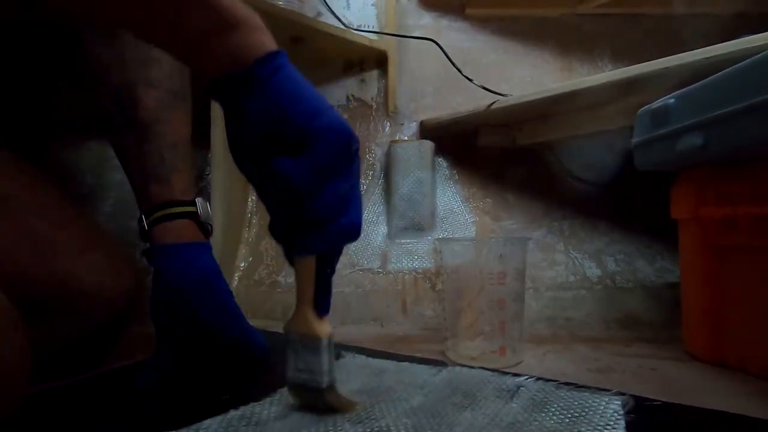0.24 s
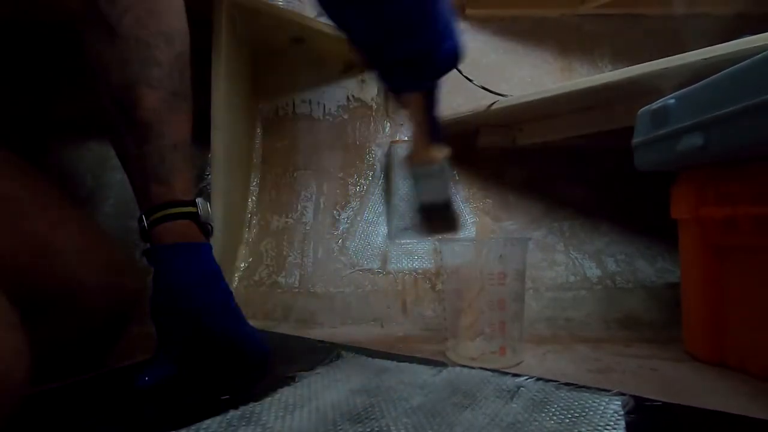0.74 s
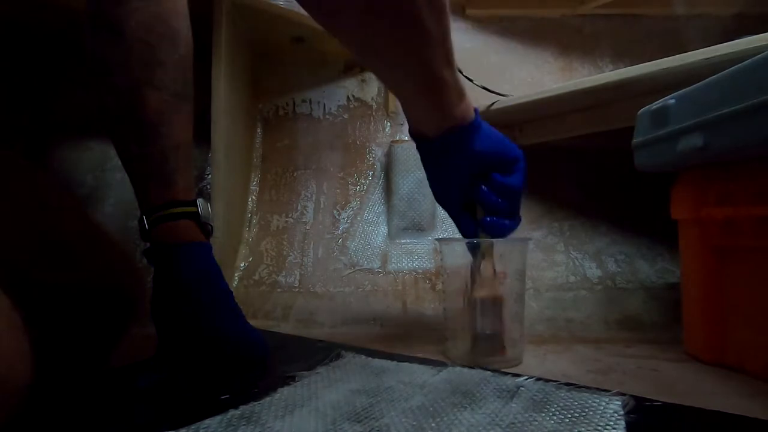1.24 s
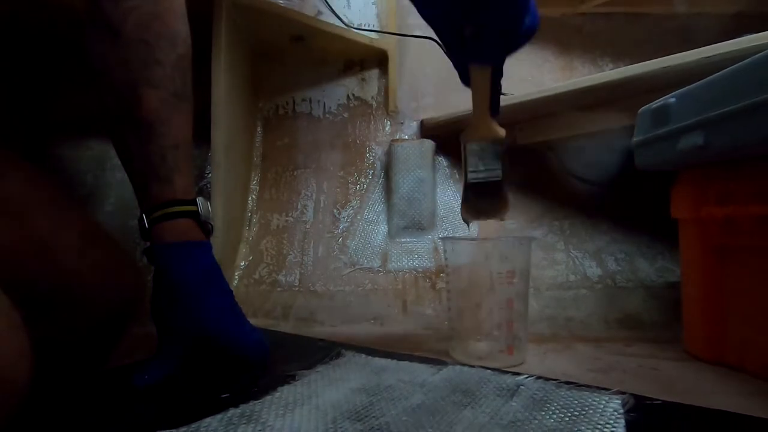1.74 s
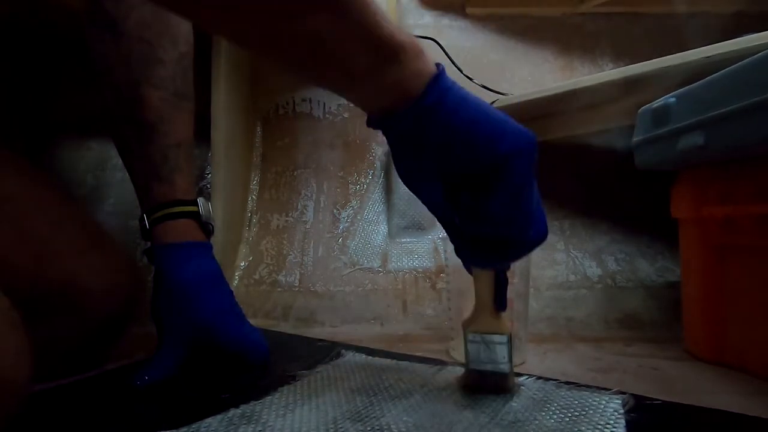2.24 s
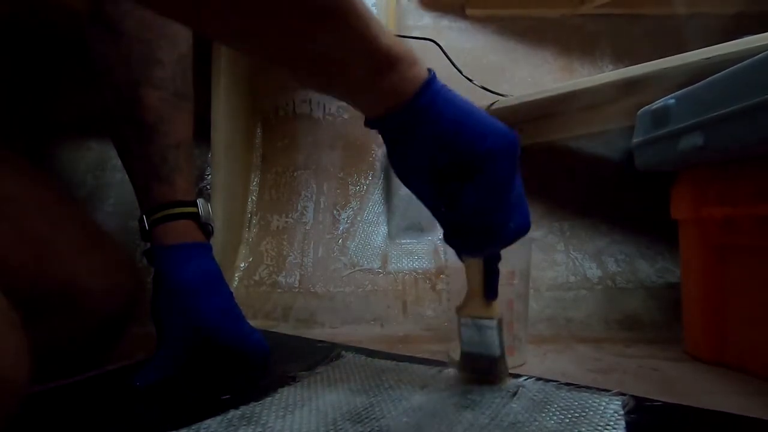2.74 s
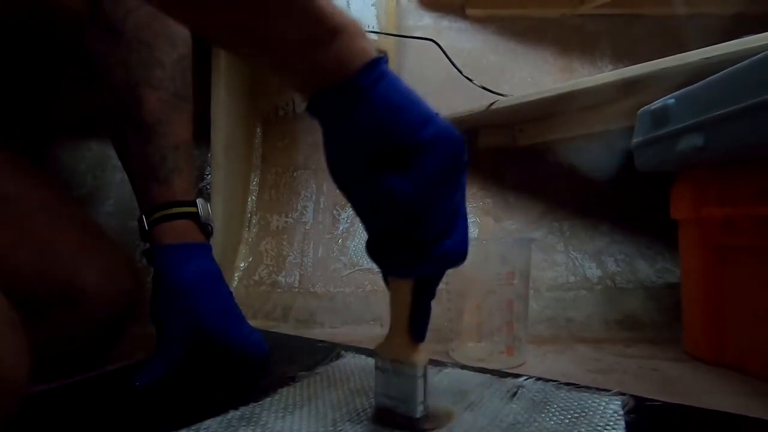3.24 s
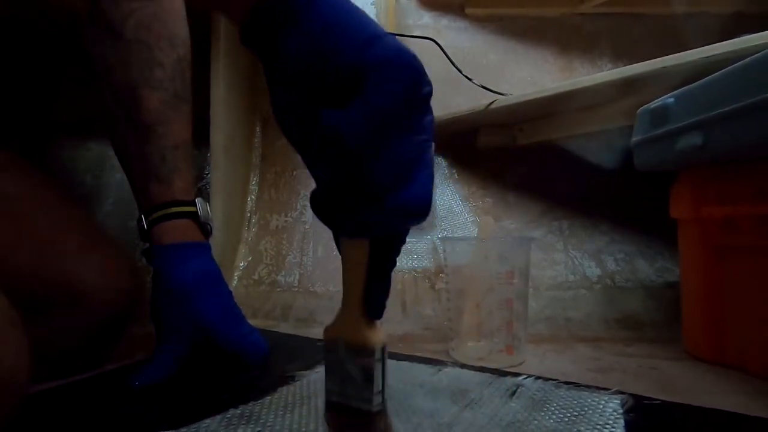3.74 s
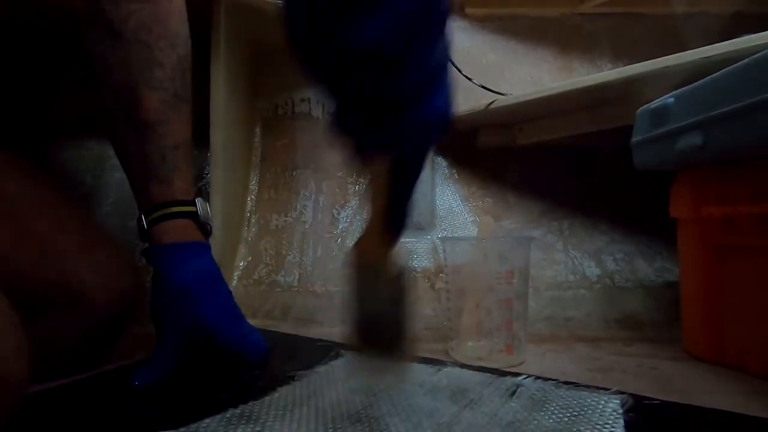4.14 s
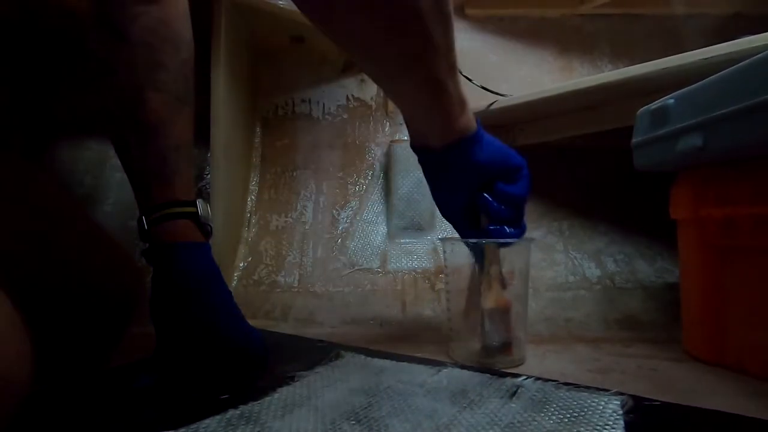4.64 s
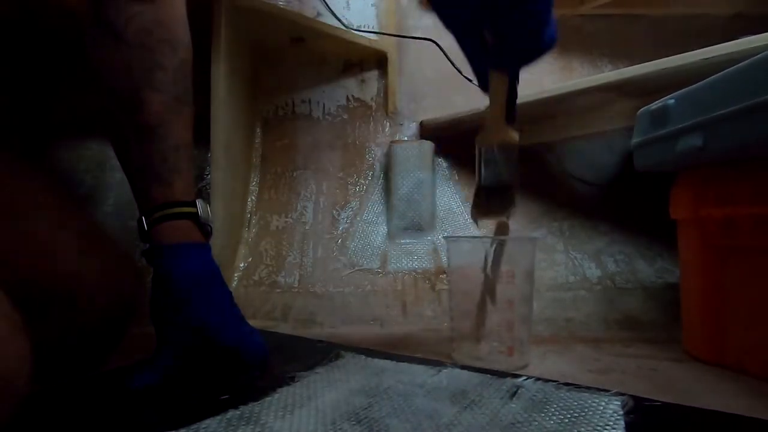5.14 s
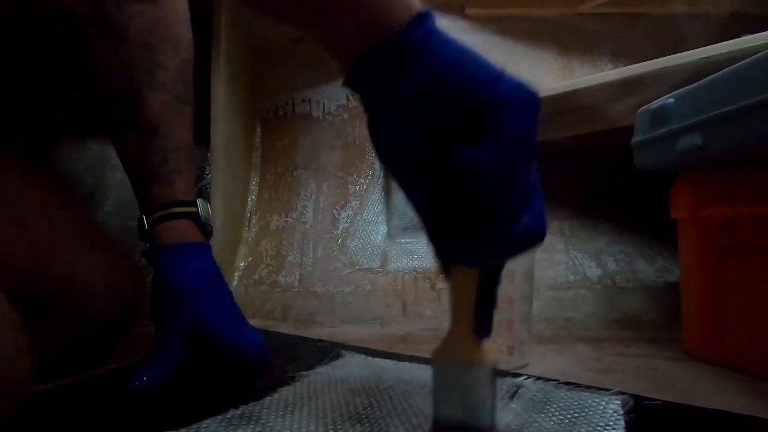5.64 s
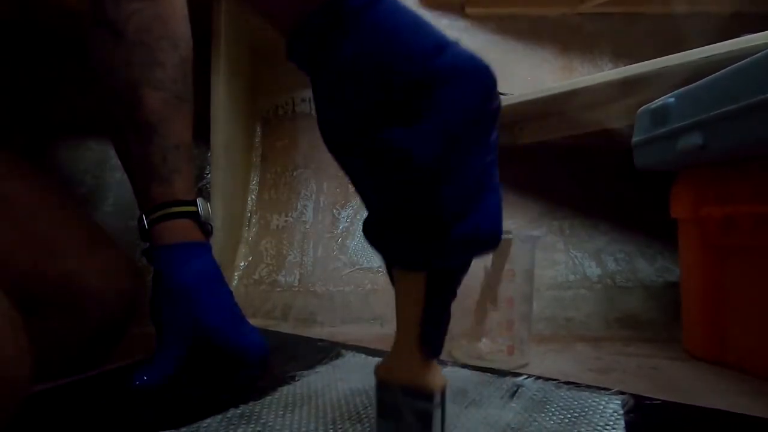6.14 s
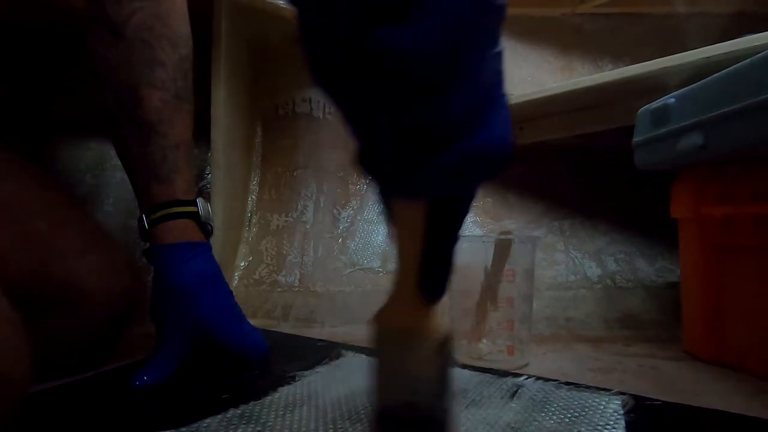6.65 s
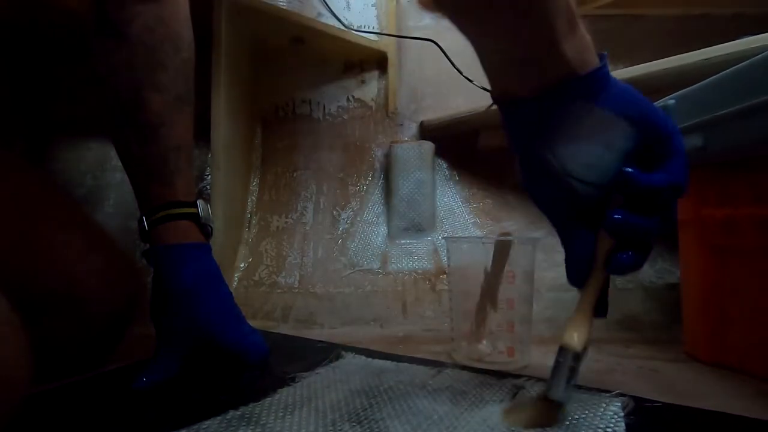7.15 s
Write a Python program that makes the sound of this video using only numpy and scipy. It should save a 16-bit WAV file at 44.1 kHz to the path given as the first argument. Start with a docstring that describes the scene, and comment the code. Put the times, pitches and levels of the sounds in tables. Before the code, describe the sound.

Close up in a small boat cabin, a resin-wet brush is jabbed hard onto cloth over a hollow hatch, each blow a deep, dull boom with a sticky squelch. It pauses to knock and wipe softly inside a plastic cup, then jabs again, dips with a busier rattle, and ends in lighter wet dabs. A low hull rumble and faint hiss lie underneath.

```python
"""Small boat cabin: a resin-wet paintbrush is stabbed in quick runs onto glass cloth over a hollow hatch.
Hard dabs ring the hatch as decaying modes; every dab and lift squelches as shaped noise and tiny pops.
Between the runs the brush knocks and wipes in a plastic resin cup: ringing modes and stick-slip noise.
Behind them, coloured noise makes a hull rumble under a soft hiss; short reflections form the cabin."""
import sys
import numpy as np
from scipy import signal
from scipy.fft import rfft, irfft, next_fast_len
from scipy.io import wavfile
from scipy.ndimage import uniform_filter1d, map_coordinates

SR = 44100
rng = np.random.default_rng(int(sys.argv[2]) if len(sys.argv) > 2 else 0)


def int16_out(signal):
    """Quantize to a 16-bit WAV file."""
    q = np.round(np.clip(np.atleast_2d(signal).T, -1, 1) * 32767)
    wavfile.write(sys.argv[1], SR, q.astype(np.int16))


N = 325899

# Tables: levels are before the layer gains; noise is scaled to rms 1 after its spectrum.
# Background levels: time_s, level_db
DEEP_LEVEL = [(0.0, -26.5), (0.68, -37), (0.88, -50.5), (1.89, -39.5), (2.84, -43.5), (3.15, -37),
              (4.16, -39), (4.32, -43.5), (5.21, -47.5), (5.56, -30), (6.13, -41.5), (6.67, -33),
              (7.08, -49), (7.39, -54)]
HULL_LEVEL = [(0.75, -46.5), (1.64, -39.5), (2.82, -41), (3.58, -42.5), (3.71, -38), (4.1, -55),
              (4.25, -50), (4.45, -48.5), (4.76, -41.5), (5.06, -36), (5.98, -39.5), (6.35, -38),
              (7.39, -37)]
HISS_LEVEL = [(0.0, -51.5), (0.95, -53), (1.54, -54), (1.81, -54), (2.76, -55.5), (3.27, -51.5),
              (3.72, -57.5), (4.11, -50.5), (4.47, -57), (4.84, -54), (4.96, -55), (6.61, -50),
              (6.69, -51.5), (7.39, -52.5)]
TREBLE_LEVEL = [(0, -76), (1.08, -89.5), (1.32, -75), (1.58, -99), (1.8, -81.5), (2.2, -75), (2.6, -84),
                (4.9, -83.5), (5.3, -95), (5.7, -79.5), (7.39, -83)]
# Background spectra: freq_hz, gain_db
DEEP_SPECTRUM = [(12, -12), (28, -1.5), (38, -13.5), (49, 3.5), (62, -10.5), (90, -39), (200, -120)]
HULL_SPECTRUM = [(12, -26), (20, -3), (43, 8.5), (56, 0.5), (71, -9), (91, 1.5), (134, -3), (186, -5.5),
                 (247, -26), (323, -13), (380, -16), (416, -17), (483, -41), (603, -42.5), (700, -30.5),
                 (910, -38), (1540, -120)]
HISS_SPECTRUM = [(320, -13), (550, -5.5), (594, -5), (672, -13), (895, -18), (1360, -7), (1540, -10),
                 (2140, -10), (2990, -15.5), (4020, -16), (4720, -24.5), (5400, -44), (7020, -75),
                 (11900, -120)]
TREBLE_SPECTRUM = [(3000, -60), (5500, -2), (8000, 0), (10000, -3), (12000, 0), (13500, -13), (16000, -27)]
# Cabin decay: freq_hz, t60_s
CABIN_DECAY = [(100, 0.71), (500, 0.26), (3000, 0.18), (12000, 0.032)]
# Brush against the cup: start_s, knock_db, wall_db, clack_db
CUP_TAPS = [(1.168, -24, -36.5, -66), (1.211, -32, -35.5, -57), (1.274, -43, -35, -62),
            (1.45, -26, -47, -52), (1.498, -26.5, -39, -56), (1.571, -34, -57, -54), (1.691, -34, -28, -53),
            (1.725, -35, -37, -58), (2.242, -24, -49, -29), (2.914, -28.5, -42.5, -56),
            (4.634, -30.5, -42, -51), (4.85, -26, -41, -42), (4.909, -24.5, -26, -35.5),
            (4.934, -25.5, -43, -29.5), (4.964, -21.5, -27, -37.5), (4.988, -16, -43, -47),
            (5.032, -18, -27.5, -42), (5.075, -35, -33, -40.5), (5.268, -26, -39, -26.5),
            (5.276, -34, -33, -39)]
# Cup modes before the common ring-length factor: freq_hz, level_db, t60_s
CUP_MODES = [(87, -8, 0.56), (150.4, -4.5, 0.21), (220.6, -4, 0.15), (310, 0.5, 0.11), (392, -2, 0.11),
             (598.5, 1.5, 0.16), (747, 6, .07), (756, -10, 0.058), (995, -26, 0.049), (1166, -5.5, 0.075),
             (1318, 2, 0.12), (1610, -31, 0.055), (1780, -7, 0.082), (2050, -19, .06)]
# Bristles wiped round the cup wall: centre_s, level_db, half_length_s
CUP_WIPES = [(1.157, -49, 0.0093), (1.3, -50.5, 0.032), (1.394, -50.5, 0.022), (1.478, -54.5, 0.058),
             (1.693, -54, 0.11), (2.086, -48, 0.0057), (4.815, -53, .012), (4.946, -34.5, 0.0053),
             (4.989, -46, .007), (5.029, -43.5, 0.0044), (5.125, -49, 0.023)]
# Cup noise spectra, clack and scrape: freq_hz, gain_db
CLACK_SPECTRUM = [(100, -43), (700, 8.5), (1400, 9), (2000, -1.5), (2700, -15), (4300, -28), (6000, -61)]
SCRAPE_SPECTRUM = [(100, -35), (480, -10), (610, 7), (800, 4), (1400, 6.5), (2200, 3.5), (3000, 0.5),
                   (4300, -6), (5500, -42), (9000, -59), (15000, -71)]
# Wet dabs on the cloth: start_s, crackle_db, slap_db, squish_db,
# touch_db (first touch re press), peel_after_s, peel_db
DABS = [(0.013, -49.5, -61, -38.5, 7, 0.059, -53), (0.199, -44.5, -43, -28.5, -19, 0.055, -58),
        (0.427, -55.5, -62, -72, -21, 0.11, -57.5), (0.557, -56, -48, -39.5, -16, 0.055, -53.5),
        (2.24, -60.5, -55, -48, 5.5, 0.064, -62), (2.402, -46.5, -37.5, -40, -20, 0.084, -46),
        (2.646, -53, -47, -66, -26, 0.034, -58), (2.689, -51, -41.5, -35, -20, 0.083, -47),
        (2.904, -42, -60, -51, -23, 0.073, -51), (3.142, -48, -41.5, -36.5, -9.5, 0.039, -48.5),
        (3.308, -57, -45, -44.5, -5, .026, -57), (3.376, -47, -38, -44.5, -19, .03, -72),
        (3.564, -45.5, -44.5, -47, -11, 0.051, -70), (3.659, -66, -49, -41, -32, .052, -58.5),
        (3.767, -47.5, -69, -68, -19, 0.134, -57.5), (3.954, -47, -43.5, -52, -18, 0.029, -54.5),
        (4.096, -51.5, -51, -64, -21, 0.031, -62), (4.155, -47.5, -59, -67, -26, 0.027, -61),
        (5.403, -65, -44, -39.5, -27, .03, -74), (5.563, -53.5, -39.5, -39.5, -7.5, 0.011, -71),
        (5.79, -47.5, -38.5, -34.5, -7, .042, -49.5), (5.947, -54, -57, -52, -23, .087, -48),
        (6.155, -62, -56, -52, -12, 0.022, -63), (6.252, -57, -42.5, -57, -21, 0.049, -73),
        (6.389, -47, -37.5, -43, -6.5, 0.042, -51), (6.598, -53, -47, -64, -3, 0.055, -45),
        (6.731, -59, -68, -48.5, -10, 0.039, -86), (6.865, -75, -43, -53, -23, 0.026, -79),
        (6.99, -56, -49, -56, -12, 0.056, -76), (7.068, -67, -52, -41, 3, 0.071, -66),
        (7.149, -64, -48.5, -48, -2.5, 0.022, -61), (7.253, -47, -48, -50, -19, 0.093, -56.5)]
# Wet brush spectra, resin snaps, resin film and squeezed resin: freq_hz, gain_db
CRACKLE_SPECTRUM = [(800, -73), (3000, 8), (4400, 4.5), (5700, -9), (7800, -2), (10000, -8.5),
                    (12000, -6.5), (14000, -19), (16000, -26)]
SLAP_SPECTRUM = [(1200, -26), (2400, -3.5), (3300, 5.5), (4300, 1.5), (4900, -12), (5600, -31), (9000, -49)]
SQUISH_SPECTRUM = [(100, -47), (300, 15.5), (600, 6.5), (1400, 7.5), (2200, 7.5), (3600, -4), (4650, -7.5),
                   (5600, -55), (9000, -71)]
# Hard blows on the hatch: start_s, boom_db, second_mode_db, knock_db, upper_db (upper modes re knock)
HATCH_BLOWS = [(0.017, -9.5, -31.5, -33.5, 5), (.208, -6, -33, -17.5, 0.5), (.24, -23, -23, -21, 1.5),
               (0.408, -13, -28, -27, 0.5), (.561, -6, -21.5, -11, -10.5), (0.591, -40, -43, -21.5, 3.5),
               (.613, -20.5, -28, -46, -8), (2.25, -38, -54, -37, -3), (2.411, -34, -52, -36.5, 0),
               (3.154, -15, -26.5, -27, -2), (3.54, -11.5, -17.5, -33.5, 9),
               (3.553, -11.5, -11.5, -16, 2.5), (3.756, -15, -30.5, -23.5, -3), (3.794, -47, -26, -48, -13),
               (3.947, -10, -24, -19, -1), (4.01, -26, -30.5, -32, 1), (4.146, -9, -22, -17, -0.5),
               (4.221, -34, -29, -45, -8), (5.546, -21, -39, -49, 0), (6.405, -22, -37, -37, -14),
               (6.631, -19.5, -39, -37.5, 2), (7.071, -19, -27, -18, 1)]
# Hatch modes before the ring-length factor of each blow: freq_hz, level_db, t60_s
HATCH_MODES = [(49.4, -26, 0.64), (74.5, -1, 0.11), (90.96, -3.5, 0.39), (126, -8.5, 0.58), (182.4, 2, 0.4),
               (226, -7.5, 0.33), (305, -3.5, 0.14), (357.3, -1.5, 0.17), (420, -7.5, 0.23),
               (573.6, -13.5, 0.15), (669, -14, 0.12), (753.6, -15.5, 0.12), (903, -22, 0.088),
               (1089, -24.5, 0.12)]
# Spectrum of the hatch's many close, weak modes: freq_hz, gain_db
THUMP_SPECTRUM = [(60, -44), (180, 2.5), (380, 8.5), (520, 0), (780, -4), (1100, -19), (2000, -18.5),
                  (4500, -40), (6000, -57)]

SHAKE_DB, SHAKE_RISE_S, SHAKE_T60_S = -27, 0.01, 0.39  # hull rumble set off by a blow, re its boom
TOUCH_LEAD_S, TOUCH_WIDTH_S = 0.025, 0.015  # the tips meet the cloth before the press
PRESS_SWELL_S, PRESS_HOLD_S, PRESS_T60_S = 0.0025, 0.011, 0.1
SQUISH_SWELL_S, SQUISH_HOLD_S, SQUISH_T60_S = 0.0037, 0.0051, 0.13  # resin squeezed through the weave
PEEL_SWELL_S, PEEL_HOLD_S, PEEL_T60_S = 0.004, 0.0089, 0.11  # bristles letting go
PEEL_SQUISH_DB, PEEL_SLAP_DB = -1.5, 2.5  # re the peel's crackle, before layer gains
SOAK_DB, SOAK_WIDTH_S = -35, 0.064  # faint crackle of the wet cloth, re press
CLUMP_DB, CLUMPS_PER_S = 4.5, 180  # the resin gives way unevenly
KNOCK_LAG_S = 0.00308  # from first push until the bristles bottom out
FREE_RING, KNOCK_DAMPING = 0.99, 3.85  # free ring-length factor; a hard knock pins the panel and shortens it
TOP_HZ = 15800


def amp(db):
    """Decibels to gain."""
    return 10 ** (np.asarray(db) / 20)


def unit(x):
    """Scale to rms 1."""
    return x / np.sqrt(np.mean(x ** 2) + 1e-20)


def along(points, hz):
    """Interpolate (freq_hz, value) points on a log frequency axis."""
    point_hz, values = np.transpose(points)
    return np.interp(np.log(hz + 1), np.log(point_hz + 1), values)


def level_curve(rows):
    """Interpolate (time_s, level_db) rows to one value per sample."""
    time_s, level_db = np.transpose(rows)
    return np.interp(np.arange(N) / SR, time_s, level_db)


def wobble(knots_per_s):
    """A smooth random curve."""
    knots = rng.standard_normal(int(N * knots_per_s / SR) + 4)
    return map_coordinates(knots, [np.arange(N) * knots_per_s / SR])


def filtered(x, response):
    """Multiply the spectrum of x by a response of frequency."""
    size = next_fast_len(len(x) + SR // 4)
    hz = np.fft.rfftfreq(size, 1 / SR)
    return irfft(rfft(x, size) * response(hz), size)[:len(x)]


def coloured(x, spectrum):
    """Shape x by a spectrum, at rms 1."""
    return unit(filtered(x, lambda hz: amp(along(spectrum, hz))))


def noise(spectrum):
    """Steady coloured noise of rms 1."""
    return coloured(rng.standard_normal(N), spectrum)


def pops(rate_per_s, spread_db):
    """Random tiny impulses of uneven size."""
    hits = rng.random(N) < rate_per_s / SR
    return hits * rng.standard_normal(N) * amp(spread_db * rng.standard_normal(N))


def fade(t, t60_s):
    """Exponential decay, 60 dB in t60_s."""
    return np.exp(-np.log(1000) * t / t60_s)


def stroke(t, swell_s, hold_s, t60_s):
    """Contact envelope about t = 0: swells in, holds, dies away."""
    return np.exp(np.minimum(t, 0) / swell_s) * fade(np.maximum(t - hold_s, 0), t60_s)


def add(track, start_s, sound):
    """Mix a sound into the track at start_s, trimmed to fit."""
    start = round(start_s * SR)
    sound = sound[max(-start, 0):]
    part = track[max(start, 0):][:len(sound)]
    part += sound[:len(part)]


def ring(modes, colour, t, length, rise_cycles, scatter_db, detune):
    """One blow on a set of modes; the spot that is hit changes each mode a little."""
    out = np.zeros(len(t))
    scatter = rng.standard_normal((len(modes), 2))
    for (hz, db, t60_s), (size, shift) in zip(modes, scatter):
        gain = amp(db + along(colour, hz) + scatter_db * size)
        rise = 1 - np.exp(-(t * hz / rise_cycles) ** 2)
        swing = np.sin(2 * np.pi * hz * (1 + detune * shift) * t)
        out += gain * rise * fade(t, t60_s * length) * swing
    return out


def patchy(x, depth_db):
    """Let each part of the spectrum swell and sink on its own."""
    spectra = signal.stft(x, nperseg=512)[2]
    field = rng.standard_normal(spectra.shape)
    for _ in range(2):
        field = uniform_filter1d(field, size=11, axis=0)
        field = uniform_filter1d(field, size=11, axis=1)
    uneven = spectra * amp(depth_db * unit(field))
    return unit(signal.istft(uneven, nperseg=512)[1][:N])


def background():
    """Uneven hull rumble, stirred up by each blow, under a soft hiss and treble that swell and sink."""
    shake, t = np.zeros(N), np.arange(SR) / SR
    for start_s, boom_db, *_ in HATCH_BLOWS:
        rise = 1 - np.exp(-(t / SHAKE_RISE_S) ** 2)
        add(shake, start_s, amp(boom_db + SHAKE_DB) * rise * fade(t, SHAKE_T60_S))
    deep = amp(level_curve(DEEP_LEVEL) + 0.5 + 1.9 * wobble(5.1)) * noise(DEEP_SPECTRUM)
    drone = unit(filtered(noise(HULL_SPECTRUM), lambda hz: hz ** 2 / (hz ** 2 + 60 ** 2)))
    hull = (amp(level_curve(HULL_LEVEL) + 1.96 + 2.2 * wobble(9)) + shake) * drone
    air = patchy(noise(HISS_SPECTRUM), depth_db=1.7)
    hiss = amp(level_curve(HISS_LEVEL) - 0.37 + 1.3 * wobble(19)) * air
    treble = amp(level_curve(TREBLE_LEVEL)) * noise(TREBLE_SPECTRUM)
    return deep + hull + hiss + treble


def cabin(x):
    """The close walls answer briefly, longest in the bass: convolution with decaying noise."""
    hz, t, spectra = signal.stft(rng.standard_normal(SR // 2), SR, nperseg=256)
    decay = amp(-60 * t / along(CABIN_DECAY, hz)[:, None])
    tail = signal.istft(spectra * decay, SR, nperseg=256)[1]
    return signal.fftconvolve(x, tail / np.linalg.norm(tail))[:N]


def walls(x, count=8):
    """Glossy hull sides within arm's reach return a few quick copies that colour the sound."""
    out = x.copy()
    delays_s = rng.uniform(0.001473, 0.012, count)
    for delay_s, sign in zip(delays_s, np.sign(rng.standard_normal(count))):
        add(out, delay_s, 0.15 * sign * x)
    return out


def cup():
    """The wet brush bumps the cup's bottom, clacks on its thin wall and wipes round it."""
    shell, crack, t = np.zeros(N), np.zeros(N), np.arange(SR // 3) / SR
    now = np.arange(N) / SR
    rub = np.zeros(N)
    for centre_s, db, half_s in CUP_WIPES:
        rub += amp(db) * np.exp(-((now - centre_s) / half_s) ** 2 / 2)
    contact = 1 - np.exp(-(t / 0.0012) ** 2)
    for start_s, knock_db, wall_db, clack_db in CUP_TAPS:
        colour = [(400, knock_db), (610, wall_db), (830, clack_db - 7.0)]
        add(shell, start_s, ring(CUP_MODES, colour, t, length=0.76, rise_cycles=0.87,
                                 scatter_db=3.5, detune=0.021))
        add(crack, start_s, amp(clack_db) * contact * fade(t, 0.065))
        drag = amp(clack_db - 24) + amp(knock_db - 26)  # every tap drags the bristles a little
        add(rub, start_s, drag * contact * fade(t, 0.093))
    slips = rub * amp(2.8 * wobble(70))  # the bristles stick and slip
    wall = fade(t, 0.09) * np.sin(2 * np.pi * 605 * t)  # the slips keep the wall's hollow note going
    hollow = signal.fftconvolve(slips * rng.standard_normal(N), wall / np.linalg.norm(wall))[:N]
    coarse = coloured(pops(rate_per_s=2200, spread_db=1.5), SCRAPE_SPECTRUM)
    fine = coloured(pops(rate_per_s=2600, spread_db=2.0), CRACKLE_SPECTRUM)
    scrape = slips * (amp(-0.5) * coarse + amp(-29) * fine)
    clack = crack * noise(CLACK_SPECTRUM)
    return amp(-1.5) * shell + amp(-0.2) * clack + scrape + amp(-1.5) * hollow


def bristles():
    """Tips touch, bristles slap and splay, then peel off; resin threads and bubbles snap in clumps."""
    early_s = 1 / 5  # envelopes start ahead of the press
    t = np.arange(SR * 2 // 3) / SR - early_s
    tips = np.exp(-((t + TOUCH_LEAD_S) / TOUCH_WIDTH_S) ** 2 / 2)
    soak = amp(SOAK_DB) * np.exp(-(t / SOAK_WIDTH_S) ** 2 / 2)
    press = stroke(t, PRESS_SWELL_S, PRESS_HOLD_S, PRESS_T60_S) + soak
    squeeze = stroke(t, SQUISH_SWELL_S, SQUISH_HOLD_S, SQUISH_T60_S)
    crackle, slap, squish = np.zeros((3, N))
    for start_s, crackle_db, slap_db, squish_db, touch_db, peel_after_s, peel_db in DABS:
        touch = amp(touch_db) * tips
        wet = amp(-2.0) * touch + squeeze
        peel = amp(peel_db) * stroke(t - peel_after_s, PEEL_SWELL_S, PEEL_HOLD_S, PEEL_T60_S)
        add(crackle, start_s - early_s, amp(crackle_db) * (touch + press) + peel)
        add(slap, start_s - early_s, amp(slap_db) * wet + amp(PEEL_SLAP_DB) * peel)
        add(squish, start_s - early_s, amp(squish_db) * wet + amp(PEEL_SQUISH_DB) * peel)
    grains = amp(2 * wobble(260)) * pops(rate_per_s=9000, spread_db=2.5)
    clumps = amp(CLUMP_DB * wobble(CLUMPS_PER_S))
    snaps = crackle * coloured(grains, CRACKLE_SPECTRUM)
    film = slap * coloured(clumps * pops(rate_per_s=2700, spread_db=1.0), SLAP_SPECTRUM)
    mush = squish * coloured(clumps * pops(rate_per_s=4000, spread_db=3.5), SQUISH_SPECTRUM)
    return amp(-2.5) * snaps + amp(-2.5) * film + amp(0.8) * mush


def hatch():
    """Bristles push the panel into its boom; a moment later they bottom out and knock its higher modes."""
    panel, blur, t = np.zeros(N), np.zeros(N), np.arange(SR * 2 // 3) / SR
    low_modes, high_modes = HATCH_MODES[:5], HATCH_MODES[5:]
    for start_s, boom_db, second_db, knock_db, upper_db in HATCH_BLOWS:
        length = FREE_RING / (1 + KNOCK_DAMPING * amp(knock_db))
        knock_s = start_s + KNOCK_LAG_S
        boom_colour = [(110, boom_db), (170, second_db)]
        knock_colour = [(430, knock_db), (580, knock_db + upper_db)]
        add(panel, start_s, ring(low_modes, boom_colour, t, length, rise_cycles=0.3,
                                 scatter_db=1, detune=0.012))
        add(panel, knock_s, ring(high_modes, knock_colour, t, length, rise_cycles=0.59,
                                 scatter_db=1.5, detune=0.019))
        # noise stands in for many close, weak modes
        add(blur, knock_s, amp(knock_db + upper_db) * (1 - np.exp(-t / 0.0003)) * fade(t, 0.14))
    return panel + amp(-10) * blur * noise(THUMP_SPECTRUM)


def scene():
    """Mix background, cup, bristles and hatch, with the cabin's answer."""
    thuds = hatch()
    small = cup() + amp(-2.2) * walls(bristles())
    room = cabin(amp(-18.5) * thuds + amp(-14.0) * small)
    return (thuds + small + room + background())[None]


def record(dry):
    """Band limit: nothing passes from TOP_HZ up."""
    return filtered(dry[0], lambda hz: hz < TOP_HZ)[None]


dry = scene()
out = record(dry)
int16_out(out)
```